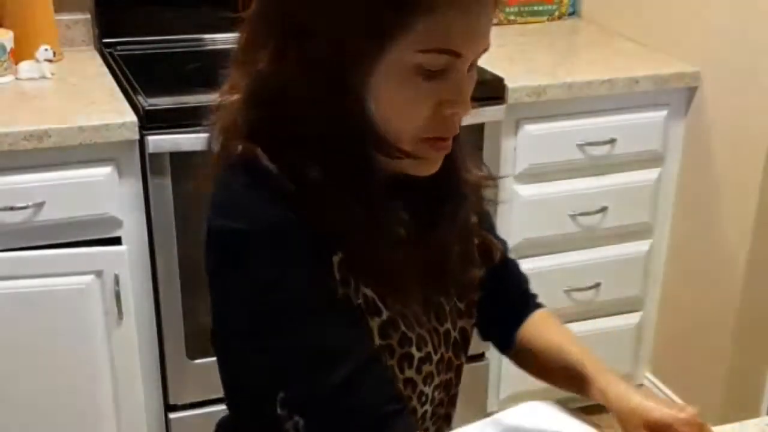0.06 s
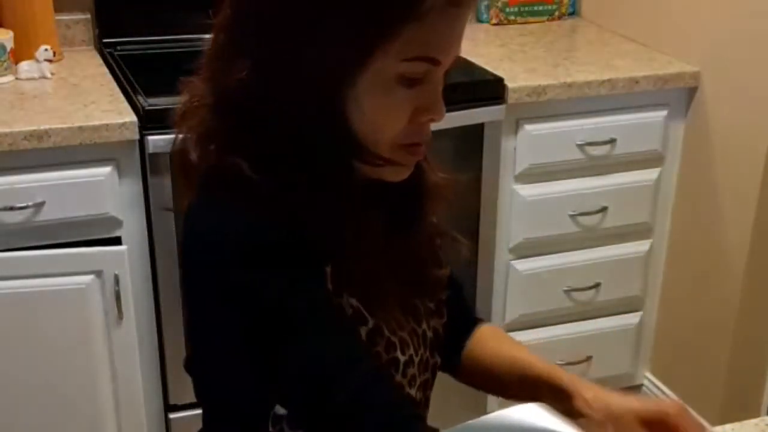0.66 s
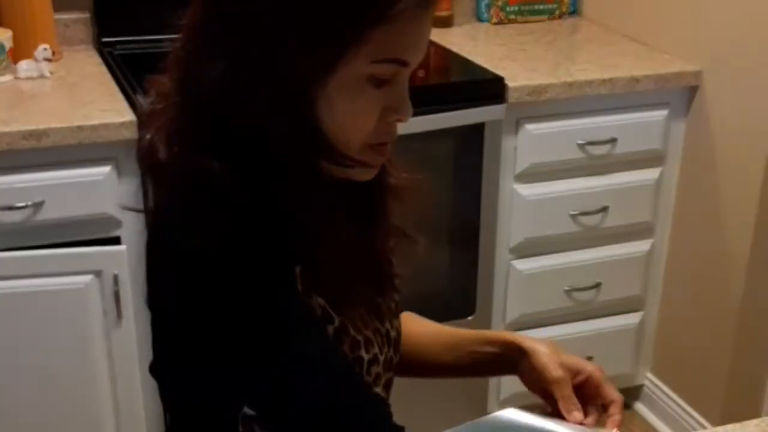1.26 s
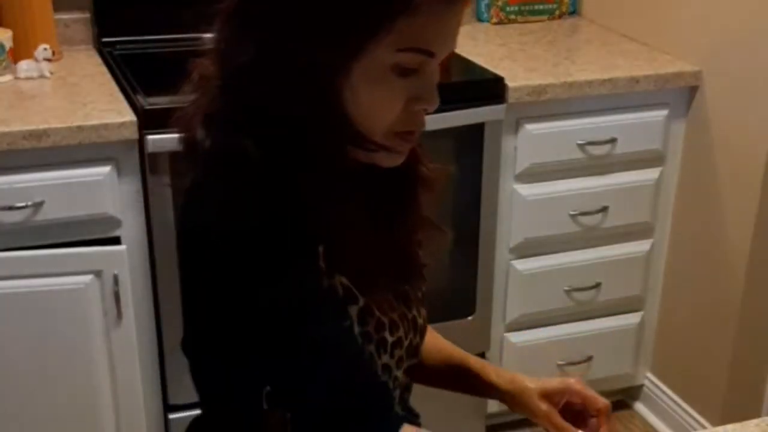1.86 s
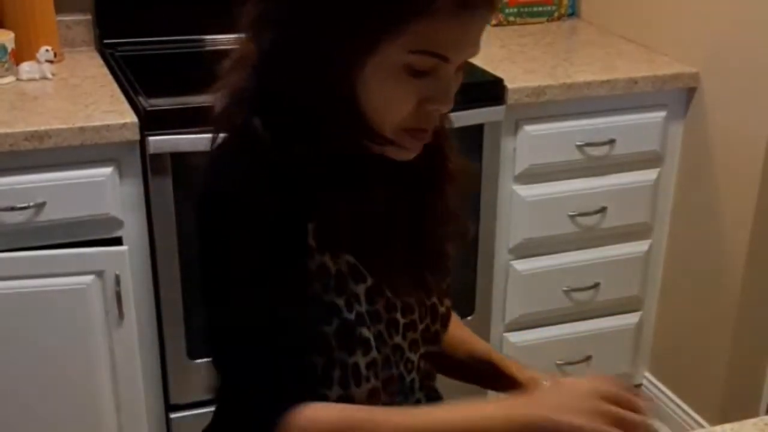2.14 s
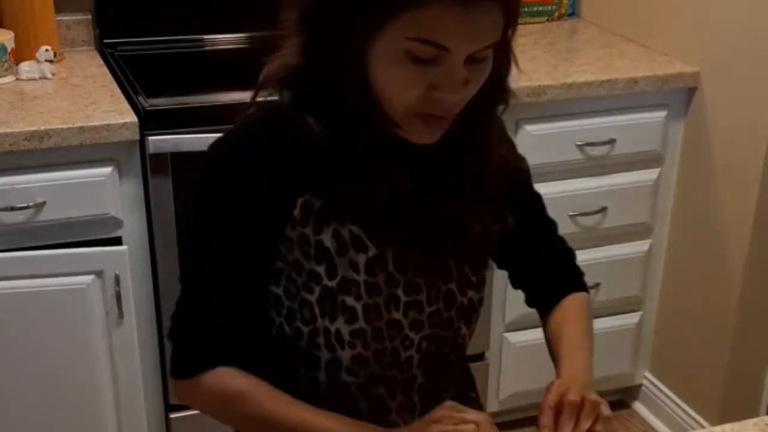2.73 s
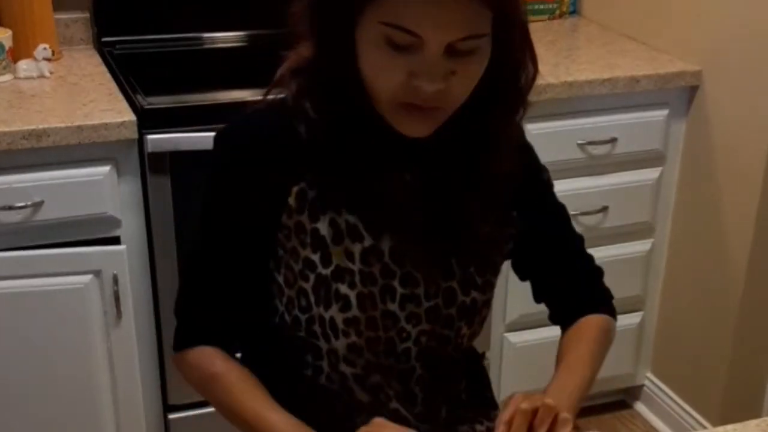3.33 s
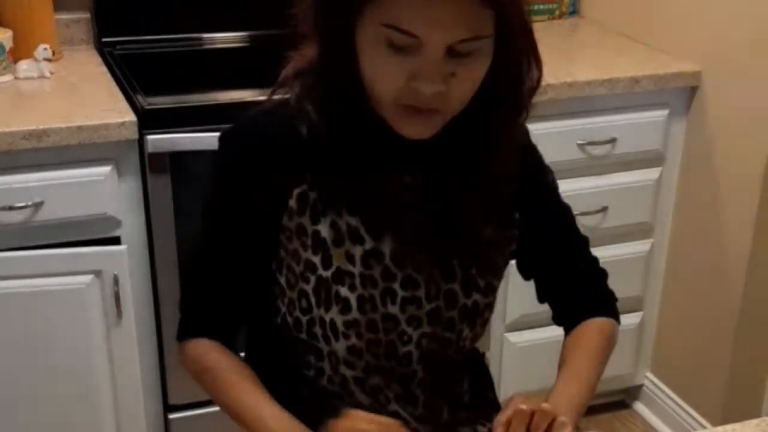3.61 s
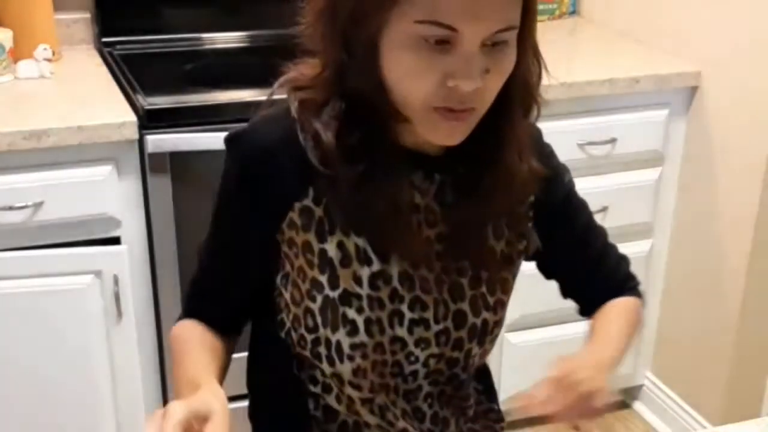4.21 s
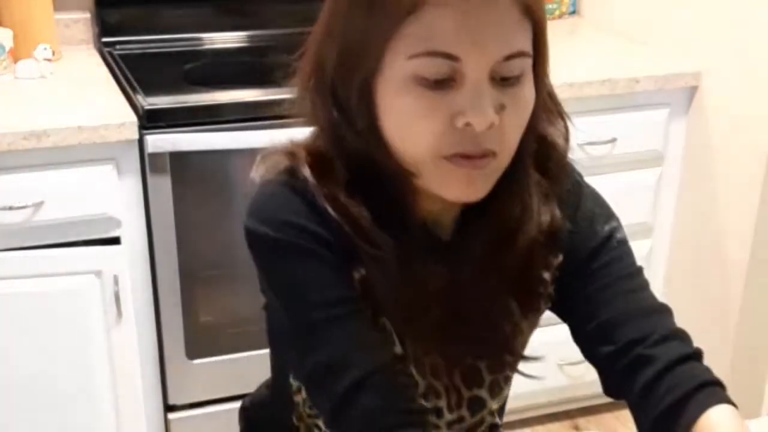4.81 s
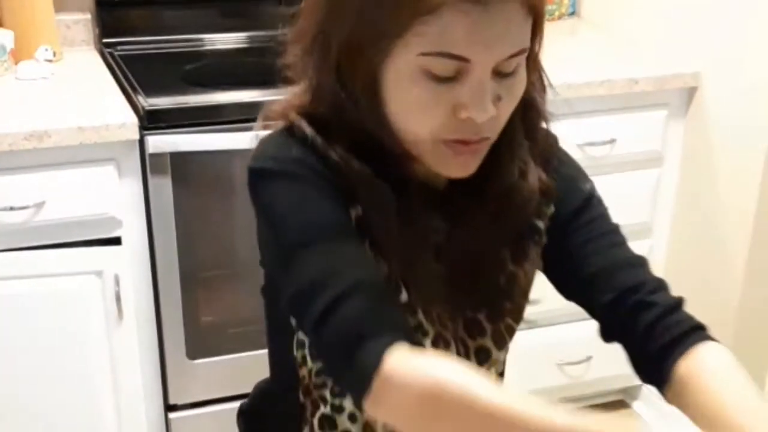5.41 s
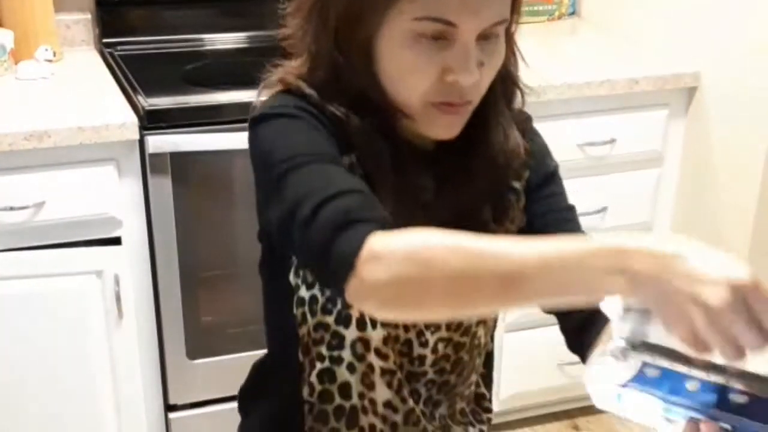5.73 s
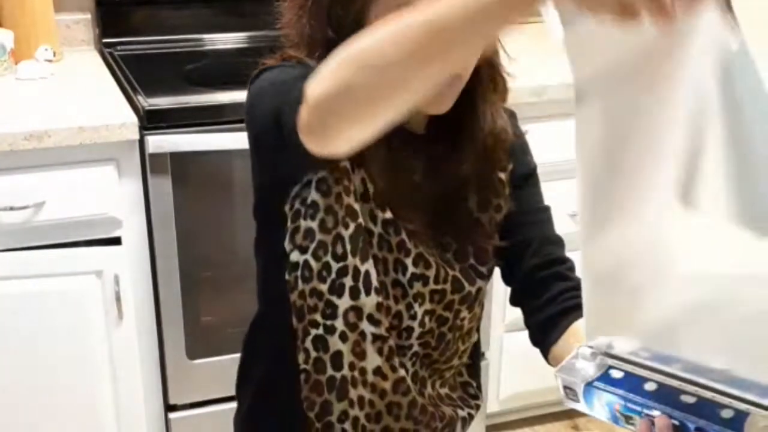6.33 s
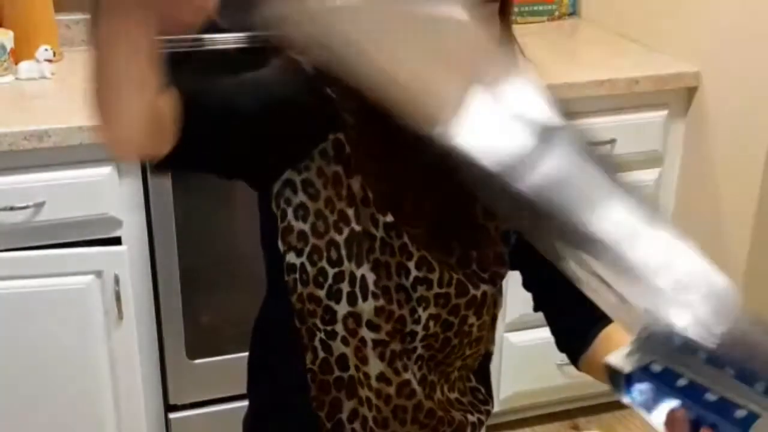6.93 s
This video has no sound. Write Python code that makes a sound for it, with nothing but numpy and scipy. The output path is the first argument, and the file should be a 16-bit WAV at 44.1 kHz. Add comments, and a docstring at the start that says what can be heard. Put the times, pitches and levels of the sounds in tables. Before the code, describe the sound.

Aluminium foil crackles and snaps as it is crimped over a pan, then a new sheet is pulled from its carton.

```python
"""A small kitchen with hard cabinets, an appliance humming, a two-port microphone a few steps from the pan.
First, hands crimp aluminium foil round the pan: each crease snaps and sets off a cascade of tiny buckles,
the sheet rustles in between, and the cabinets ring after every crackle. After a short lull, about five
seconds in, the carton is picked up with a hollow knock. Last, a new sheet is drawn off in two tugs
and a long pull, while the roll rumbles in its carton."""
import sys
import numpy as np
from scipy import signal
from scipy.fft import rfft, irfft, next_fast_len
from scipy.io import wavfile
from scipy.ndimage import uniform_filter1d

SR = 44100
rng = np.random.default_rng(int(sys.argv[2]) if len(sys.argv) > 2 else 0)


def to_wav(s):
    """Save 16-bit WAV."""
    ch = np.atleast_2d(s).T  # columns
    pcm = np.round(np.clip(ch, -1, 1) * 32767)  # PCM
    wavfile.write(sys.argv[1], SR, pcm.astype(np.int16))


N = 311346


def creases(smear_s=0.002414, base_decay_s=0.0053, doubling_db=28, snap_relief=0.58, rise_s=0.00075):
    """A fold in the foil gives way with one snap, then its neighbours buckle in a dying cascade."""
    # the creases that stand out: (time [s], snap level [dB], cascade level [dB], brightness [dB/octave])
    folds = [(0.05, -21.5, -11.5, 6.1), (0.394, -23, -12.5, 2.5), (0.433, -19, -8.5, 4),
             (0.449, -15, -17, 5.5), (0.507, -30, -19, 6), (0.676, -28, -23.5, 7), (0.73, -19, -1.5, -1.5),
             (0.788, -10, -0.5, -1), (0.8713, -3, 0, 2), (1.0115, -11.5, -5.5, 1.6),
             (1.2655, -35, -22, 1.5), (1.3149, -23.5, -22.5, 3.5), (1.4778, -37, -22.5, -2),
             (1.6315, -12, -9.5, 2.5), (1.6968, -21, -4, 1.8), (1.752, -15, -11.5, 6),
             (1.7593, -12, -0.5, 5.5), (1.778, -27, 0, -4), (1.828, -28, 1.5, 3.6), (2.021, -25, -9.5, 3.5),
             (2.0646, -6, -0.5, 5), (2.1, -22, 2, 3), (2.179, -19, -10.5, 4), (2.2768, -16, 3.5, 3.5),
             (2.292, -14, -5.5, 3), (2.4512, -19, -14.5, 2), (2.5443, -38, -19.5, 7),
             (2.6861, -13, -7.5, 1.5), (2.721, -29, -6, -1.5), (2.88, -3.5, 0.5, 3.5),
             (2.9544, -14, -1, 1.5), (3.06, -5, -7.5, -1.4), (3.1109, -23, -2, 1.5), (3.249, -26, -12, 3.5),
             (3.3712, -16.5, -15.5, -1.5), (3.4454, -32, -7.5, -1.5), (3.711, -28, -4, -1),
             (3.736, -13, -0.5, 2.5), (3.821, -4.5, -3.5, 2), (3.9355, -24, -1, -5.5),
             (3.95, -25, -1.5, 1.7), (4.153, -29, -3, -3), (4.174, -18, -7.5, 3.5), (4.274, -15, -8.5, 2.5),
             (4.2853, -9.5, -2.5, -0.5), (4.3343, -7.5, -2, 1.1), (4.421, -10, -0.5, 1),
             (4.472, -21, -4, -2), (4.495, -19, -1.5, -1), (5.2137, -32, -23, 5.5),
             (5.2982, -13, -9.5, 1.5), (5.4873, -17, -14.5, -3.5), (5.6336, -21.5, -8, 2.5),
             (5.727, -39, -10.5, 3), (5.8096, -11, -15, 4), (5.8921, -9, -8, 0), (6.02, -31, -8.5, 0.5),
             (6.157, -14.5, -9, 5), (6.236, -23, -27, 7), (6.3518, -36, -12, 7), (6.412, -2.5, -4, -1.5)]
    snaps, cascades = np.zeros((2, 2, N))
    t = np.arange(2 ** 13) / SR
    hz = bins(2 ** 10)
    for s, snap_db, cascade_db, brightness_db in folds:
        # bending waves are dispersive: the treble of a snap arrives first, the rest is smeared behind it
        delay = smear_s * np.exp(-hz / rng.uniform(3500, 5500))
        snap = irfft(np.exp(-2j * np.pi * np.cumsum(delay * np.gradient(hz))))
        add(snaps, s, undb(snap_db - 3) * facet(snap, brightness_db + 2.4))
        # a cascade runs on for longer when it is big and when its snap has released little
        decay_s = base_decay_s * 2 ** ((cascade_db - snap_relief * snap_db) / doubling_db)
        envelope = np.exp(-t / decay_s) * (1 - np.exp(-t / rise_s))
        cascade = buckles(envelope, per_second=7000, spread_db=4)
        add(cascades, s, undb(cascade_db) * facet(cascade, brightness_db))
    return snaps, cascades


def buckles(envelope, per_second, spread_db):
    """Random tiny clicks under an envelope, many weak and few strong; total energy 1."""
    size = len(envelope)
    strength = undb(spread_db * np.minimum(rng.exponential(size=size), 4))
    fires = rng.random(size) < per_second / SR
    clicks = fires * rng.choice([-1, 1], size) * strength * envelope
    return unit(clicks) / np.sqrt(size)


def facet(x, brightness_db, patchy_db=1.7, knee_hz=3000, pan_db=2.51, lag_ms=0.091, wander_ms=0.037):
    """One patch of the sheet radiates, with its own resonances and its own direction to the two ports."""
    # what buckling foil radiates: (frequency [Hz], level [dB])
    foil = [(60, -6.5), (150, -7.5), (300, -3.5), (480, -8.5), (670, -4), (1120, -1.4), (1750, 5),
            (2800, 5), (4400, 4), (6600, 0.2), (9800, 0.26), (14000, -3), (16000, -9)]
    hz = bins(x.shape[-1])
    resonances = np.geomspace(300, 16000, 36)
    ripple_db = patchy_db * np.interp(hz, resonances, rng.standard_normal(len(resonances)))
    tilt_db = brightness_db * np.log2(np.hypot(1, hz / knee_hz))
    sound = colour(x, read(foil, hz) + tilt_db + ripple_db) / np.sqrt(np.mean(undb(ripple_db) ** 2))
    lag_s = (lag_ms + wander_ms * rng.standard_normal()) / 1000
    left = irfft(rfft(sound) * np.exp(-2j * np.pi * hz * lag_s))
    pan = undb(pan_db * rng.standard_normal())
    return np.array([left * pan, sound / pan])


def movement(attack_s=0.0067, release_s=0.005):
    """Level and brightness of the sheet: each press swells, holds and fades; the draw follows the arm."""
    # hands press the sheet round the pan, then shift the carton:
    # (time [s], hold [s], level [dB], brightness [dB/octave])
    presses = [(-0.02, 0.11, -36.5, -2.5), (0.335, 0.06, -47.5, -4.5), (0.41, 0.35, -40, -5),
               (0.738, 0.22, -38, -1), (0.956, 0.11, -42.5, -2.5), (1.08, 0.16, -56, -4),
               (1.242, 0.13, -47, -13.5), (1.454, 0.18, -60, -1), (1.591, 0.26, -42, -3),
               (1.745, 0.069, -33, 5), (1.863, 0.18, -47, -2), (2.032, 0.082, -31, 0.5),
               (2.143, 0.21, -38, -1), (2.39, 0.24, -48, -0.5), (2.678, 0.067, -34, 3),
               (2.83, 0.11, -43, -3), (2.866, 0.16, -44.5, 2), (3.076, 0.14, -43.5, 0),
               (3.39, 0.13, -43.5, -2.5), (3.597, 0.07, -38, -4), (3.726, 0.083, -38.5, 2),
               (3.924, 0.13, -44, -1), (4.141, 0.39, -41.5, -1.5), (5.145, 0.07, -56, -4.5),
               (5.22, 0.13, -45.5, -0.5), (5.368, 0.21, -51.5, 0.5), (5.73, 0.17, -43.5, -2),
               (5.95, 0.2, -52.5, 2)]
    # a new sheet comes off the roll: (time [s], level [dB], brightness [dB/octave])
    draw = [(6.1, -37.5, -2), (6.15, -30.5, -4.5), (6.31, -41, 2), (6.39, -31, -0.5), (6.6, -38.5, -1),
            (6.8, -31, -3.5), (6.89, -28, -0.5), (7.0, -34, -4), (7.06, -29.5, -3.5)]
    t = np.arange(N) / SR
    s, level_db, brightness_db = np.transpose(draw)
    power = undb(np.interp(t, s, level_db, left=-120)) ** 2
    weighted_tilt = power * np.interp(t, s, brightness_db)
    for start, hold_s, db, tilt_db in presses:
        swell = np.clip((t - start) / attack_s, 0, 1)
        fade = np.exp(-np.clip((t - start - hold_s) / release_s, 0, 20))
        press = (undb(db) * swell * fade) ** 2
        power += press
        weighted_tilt += press * tilt_db
    return 10 * np.log10(power), weighted_tilt / power


def rustle(level_db, brightness_db, size=2048):
    """Overlapping patches of the moving sheet crackle, one after another."""
    out = np.zeros((2, N))
    swell = np.sin(np.pi * np.arange(size) / size)
    hop = size // 2
    for start in range(0, N, hop):
        patch = np.pad(buckles(swell, per_second=1700, spread_db=5), (0, hop)) * np.sqrt(hop)
        add(out, start / SR, facet(patch, brightness_db[min(start + hop, N - 1)]))
    return out * undb(level_db)


def roll(level_db, lift_s=5.21, rumble_db=-45.5, steady_pull_db=-37, db_per_db=0.43):
    """The cardboard core catches and slips against the carton as it is lifted and the sheet is drawn."""
    # resonances of the hollow carton round the roll: (frequency [Hz], level [dB])
    carton = [(60, -14), (140, 5.5), (220, -8.5), (320, 2), (400, 5), (470, 0), (580, -8.5), (900, -2.5),
              (1200, -0.5), (2000, -6), (5000, -63)]
    size = next_fast_len(N, True)
    slips = buckles(np.ones(size), per_second=500, spread_db=2)
    rumble = unit(colour(slips, read(carton, bins(size))))[:N]
    lifted = np.arange(N) / SR > lift_s
    return rumble * lifted * undb(rumble_db + db_per_db * (level_db - steady_pull_db))


def knocks():
    """Soft knocks ring a hollow body and the worktop under it; light ticks clack and ring a higher mode."""
    # soft knocks of hands, pan and carton:
    # (time [s], ring level [dB], ring pitch [Hz], ring t60 [s], worktop thud level [dB])
    bumps = [(0.199, -57.5, 424, 0.69, -80), (0.936, -31, 367, 0.097, -41), (0.99, -43, 370, 0.082, -43),
             (4.579, -52.5, 425, 0.57, -82), (5.257, -24, 390, 0.043, -31), (5.439, -35.5, 375, 0.038, -60),
             (5.839, -29, 397, 0.062, -58), (6.139, -36, 393, 0.18, -40), (6.38, -35, 374, 0.062, -40),
             (6.799, -36.5, 424, 0.28, -60)]
    # light ticks of things being handled: (time [s], level [dB], pitch [Hz], t60 [s])
    ticks = [(0.413, -31, 1150, 0.027), (0.508, -27.5, 1180, 0.04), (0.768, -24, 2950, 0.023),
             (1.263, -30, 1810, 0.011), (1.477, -26.5, 2920, 0.0073), (2.449, -13, 1960, 0.0068),
             (2.602, -22, 2390, 0.014), (3.384, -37, 1740, 0.024), (3.823, -17, 2210, 0.015),
             (4.982, -47, 1760, 0.015), (5.037, -47, 1720, 0.025), (5.299, -31.5, 1820, 0.042),
             (5.723, -39, 1910, 0.033), (5.987, -40, 3470, 0.097)]
    out = np.zeros(N)
    thud = ring(hz=162, t60=0.17, contact_s=0.0039) + undb(-6) * ring(hz=270, t60=0.17, contact_s=0.0035)
    for s, ring_db, hz, t60, thud_db in bumps:
        hollow = ring(hz, t60, contact_s=0.00086) + undb(-15) * ring(2.05 * hz, t60, contact_s=0.0018)
        add(out, s, undb(ring_db) * hollow + undb(thud_db) * thud)
    for s, db, hz, t60 in ticks:
        tick = undb(db) * ring(hz, t60, contact_s=0.00096)
        add(out, s, undb(-2) * tick)
        add(out, s, undb(-3) * np.sqrt(np.sum(tick ** 2)) * clack(hz))
    return out


def ring(hz, t60, contact_s):
    """A damped mode, pushed for as long as the contact lasts."""
    t = np.arange(SR // 2) / SR
    return np.sin(2 * np.pi * hz * t) * np.exp(-np.log(1000) * t / t60) * (1 - np.exp(-t / contact_s))


def clack(hz, decay_s=0.0036, fall_db_per_octave=26, size=2048):
    """The dry contact of a tick: a burst of noise that falls away on both sides of its pitch; energy 1."""
    burst = rng.standard_normal(size) * np.exp(-np.arange(size) / SR / decay_s)
    octaves_off = np.abs(np.log2(bins(size) / hz))
    return unit(colour(burst, -fall_db_per_octave * octaves_off)) / np.sqrt(size)


def kitchen(x, spots, dwell):
    """A moving sound reaches the room from one of several spots, drawn anew every dwell samples."""
    spot = np.repeat(rng.integers(spots, size=N // dwell + 1), dwell)[:N]
    length = next_fast_len(N + SR // 2, True)
    spectrum = 0
    for k in range(spots):
        share = np.sin(np.pi / 2 * uniform_filter1d(1. * (spot == k), dwell))
        spectrum = spectrum + rfft(np.float32(x * share), length) * rfft(np.float32(echoes()), length)
    return irfft(spectrum, length)[:, :N]


def echoes(build_s=0.0017, early_s=0.038, sparse_db=3, size=2 ** 14):
    """The room from one spot: reflections from worktop and cabinets thicken into a short bright tail."""
    # reverberation of the kitchen: (frequency [Hz], t60 [s])
    room_t60 = [(150, 0.58), (500, 0.45), (3000, 0.37), (7000, 0.31), (14000, 0.21)]
    t, hz = np.arange(size) / SR, bins(size)
    glints = undb(sparse_db * np.exp(-t / early_s) * np.repeat(rng.standard_normal(size // 16), 16))
    field = rfft(diffuse(size) * glints * (1 - np.exp(-t / build_s)))
    centres, t60s = np.transpose(room_t60)
    response = 0
    for share, t60 in zip(np.eye(len(centres)), t60s):
        band = irfft(field * np.interp(np.log(hz), np.log(centres), share))
        response = response + band * np.exp(-np.log(1000) * t / t60) / np.sqrt(t60)
    return np.array([unit(port) for port in response]) / np.sqrt(size)


def room_tone(waver_rad=0.15, air_db=-56.5, rumble_db=-73, rumble_hz=70):
    """An appliance hums, wavering a little, over still air; each port has a faint rumble of its own."""
    # tones of the appliance: (frequency [Hz], level [dB])
    hum_tones = [(119.8, -57.5), (141, -64), (240, -70), (360, -70.5), (479, -83.5)]
    # spectrum of the kitchen's still air: (frequency [Hz], relative level [dB])
    air_spectrum = [(25, 4.5), (40, -23), (57, 0), (90, -1), (130, 0), (190, -6.5), (300, -12), (430, -16),
                    (600, -19.5), (1000, -25), (2000, -26), (4000, -28), (8000, -34.5), (16000, -29)]
    t = np.arange(N) / SR
    drift_times = np.arange(0, 8, 1 / 5)
    hum = 0
    for hz, db in hum_tones:
        drift = waver_rad * np.interp(t, drift_times, rng.standard_normal(len(drift_times)))
        hum = hum + undb(db) * np.sqrt(2) * np.sin(2 * np.pi * (hz * t + rng.random()) + drift)
    air = unit(colour(diffuse(N), read(air_spectrum, bins(N))))
    low_pass = signal.butter(2, rumble_hz, fs=SR, output="sos")
    rumble = unit(signal.sosfilt(low_pass, rng.standard_normal((2, N))))
    return hum + undb(air_db) * air + undb(rumble_db) * rumble


def diffuse(size, alike_hz=520):
    """Noise from all round the microphone: the two ports agree in the bass and part in the treble."""
    alike = 1 / (1 + (bins(size) / alike_hz) ** 2)
    mid, side = rfft(rng.standard_normal((2, size)))
    mid, side = mid * np.sqrt((1 + alike) / 2), side * np.sqrt((1 - alike) / 2)
    return irfft(np.array([mid + side, mid - side]), size)


def undb(db):
    """Decibels to gain."""
    return 10 ** (np.asarray(db) / 20)


def unit(x):
    """Scale to rms 1."""
    return x / np.sqrt(np.mean(x ** 2) + 1e-20)


def bins(size):
    """Frequencies of a spectrum of this many samples, floored at 1 Hz."""
    return np.maximum(np.fft.rfftfreq(size, 1 / SR), 1)


def read(points, hz):
    """Join (frequency [Hz], value) points on a log-frequency axis."""
    f, value = np.transpose(points)
    return np.interp(np.log(hz), np.log(f), value)


def colour(x, db):
    """Minimum-phase filter with this gain at each frequency."""
    size = x.shape[-1]
    cepstrum = irfft(np.log(undb(db)), size)
    cepstrum[1:size // 2] *= 2
    cepstrum[size // 2 + 1:] = 0
    return irfft(rfft(x) * np.exp(rfft(cepstrum)), size)


def add(out, s, x):
    """Mix a sound in at s seconds."""
    start = int(np.clip(s * SR, 0, N - 1))
    out[..., start:start + x.shape[-1]] += x[..., :N - start]


def scene():
    """From a few steps away, foil and carton reach the microphone straight and by way of the room."""
    snaps, cascades = creases()
    level_db, brightness_db = movement()
    crackle = cascades + rustle(level_db, brightness_db)
    body = roll(level_db) + knocks()
    direct = snaps + undb(-6) * crackle + undb(-2) * body
    # the crackle darts about the sheet; the carton moves more slowly
    foil_room = kitchen(undb(-3) * snaps + undb(-0.1) * crackle, spots=6, dwell=64)
    body_room = kitchen(undb(-6) * body, spots=2, dwell=500)
    return direct + foil_room + body_room + room_tone()


def record(dry, low_cut_hz=38, top_hz=15900):
    """The microphone's two ports differ a little in colour; the deepest bass and the top are cut."""
    # the left port against the right: (frequency [Hz], level [dB])
    port_balance = [(100, 3.5), (1000, 1.5), (4500, 2.5), (8000, 0.3), (15000, -1)]
    half_db = read(port_balance, bins(N)) / 2
    ports = np.array([colour(dry[0], half_db), colour(dry[1], -half_db)])
    ports = signal.sosfilt(signal.butter(3, low_cut_hz, "high", fs=SR, output="sos"), ports)
    return signal.sosfilt(signal.ellip(10, .2, 80, top_hz, fs=SR, output="sos"), ports)


dry = scene()
out = record(dry)
to_wav(out)
```